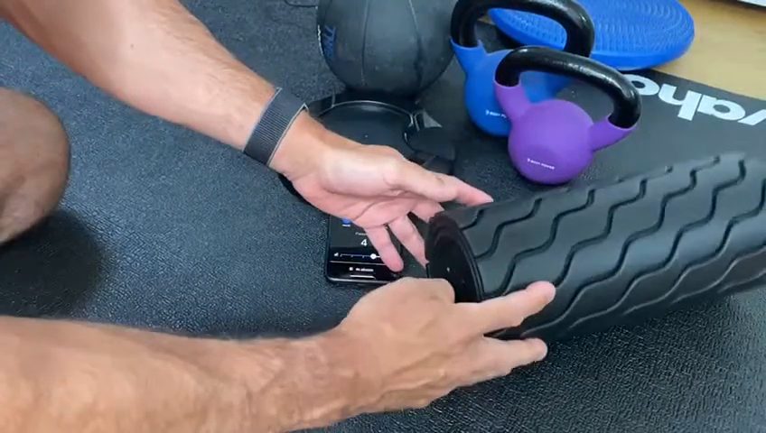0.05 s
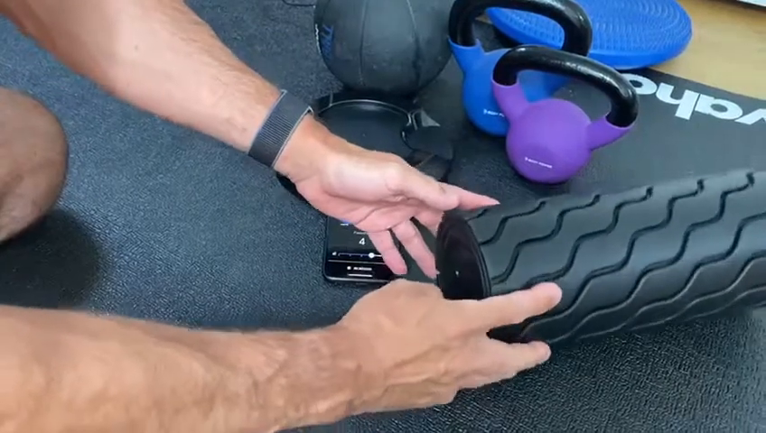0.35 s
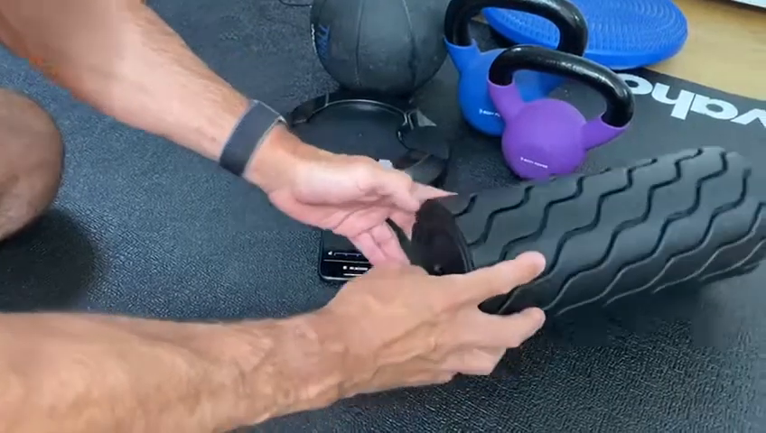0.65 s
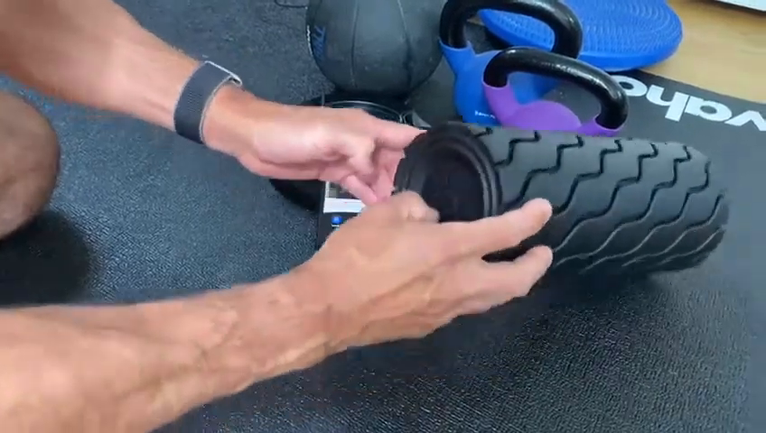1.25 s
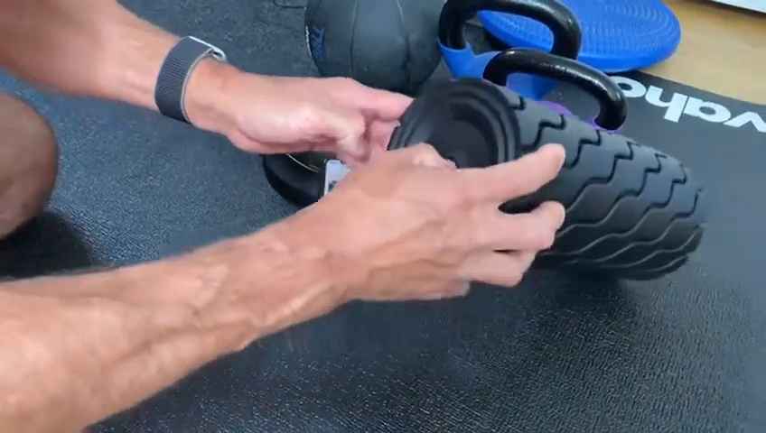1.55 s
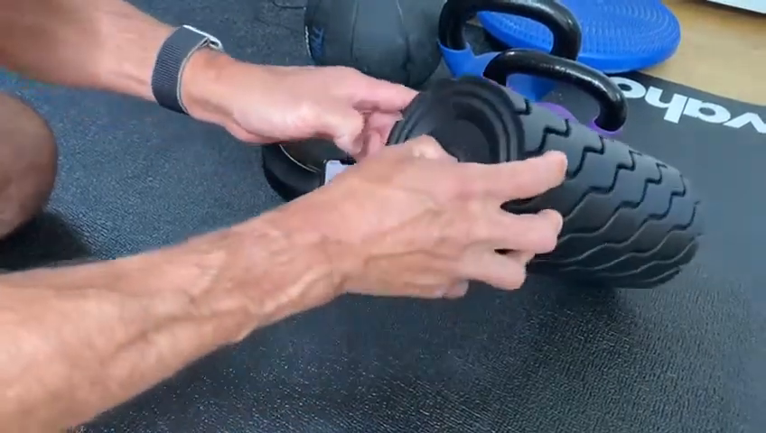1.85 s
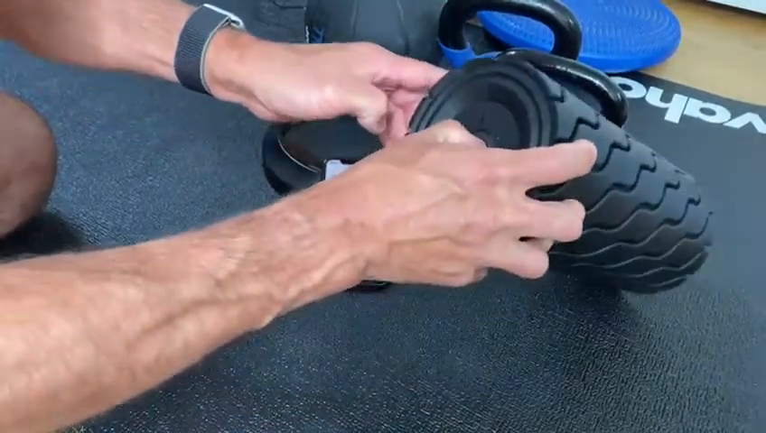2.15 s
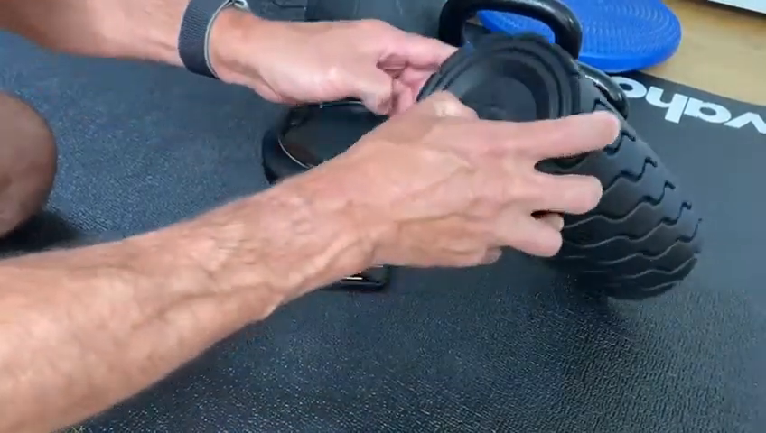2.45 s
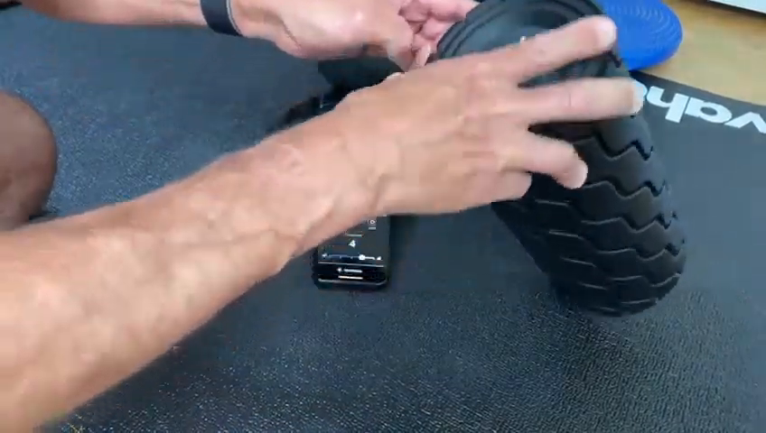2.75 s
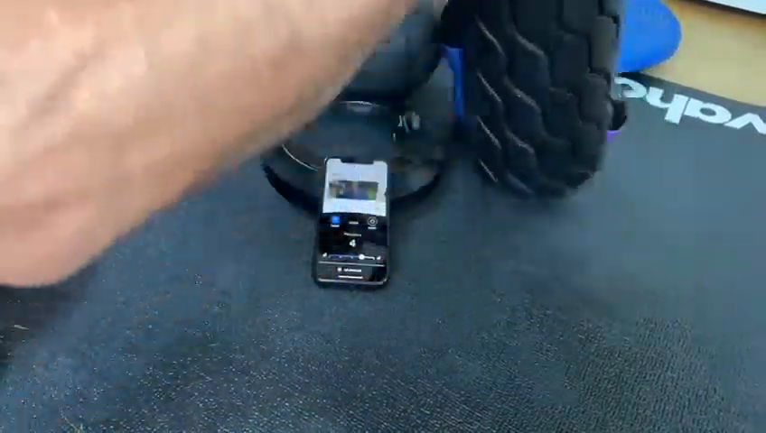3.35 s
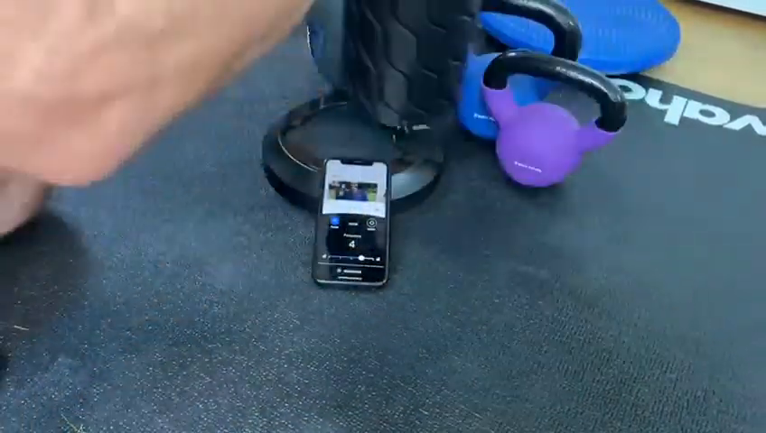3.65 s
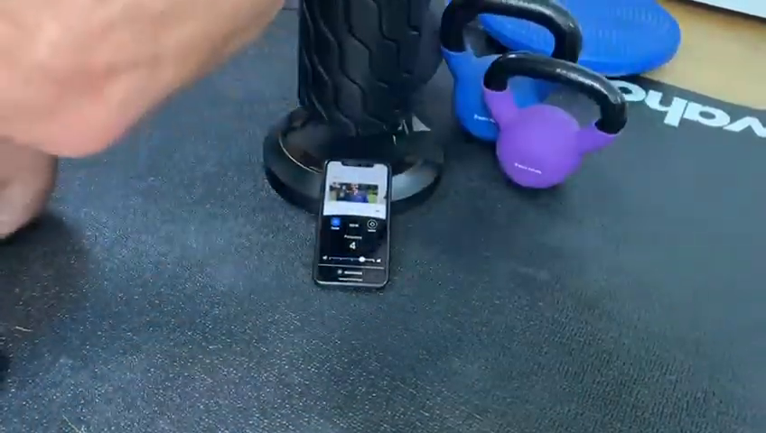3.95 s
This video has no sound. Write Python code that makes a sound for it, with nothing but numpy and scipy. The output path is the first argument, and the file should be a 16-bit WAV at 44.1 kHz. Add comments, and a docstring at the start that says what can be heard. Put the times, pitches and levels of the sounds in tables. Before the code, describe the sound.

A vibrating foam roller hums low from the start, bouncing on a mat with quick plastic clacks and hollow thuds that fade by 0.8 seconds. The hum continues with a buzzing rattle, which eases from about 1.7 to 2.3 seconds, with a couple of small clicks. At 2.4 seconds the motor switches off and whines down, stopping by 3. Faint handling bumps follow near 3 and 3.9 seconds.

```python
"""A low hum, and at once a run of plastic clacks and hollow thuds: a vibrating foam roller, shaken by
its off-centre weight at about sixty turns a second, bounces on a gym mat. Two hands steady it and tip
it on end; its loose housing chatters once a turn, except while it is pressed firm. It is switched off,
whines down to rest and is lifted away with a few light bumps in a quiet room."""
import sys
import numpy as np
from scipy import signal
from scipy.fft import rfft, irfft
from scipy.io import wavfile
from scipy.ndimage import uniform_filter1d, map_coordinates

SR = 44100
rng = np.random.default_rng(int(sys.argv[2]) if len(sys.argv) > 2 else 0)


def master_out(mix):
    """Clip the mix to full scale and print it as 16-bit PCM to the path in sys.argv[1]."""
    frames = np.transpose(np.atleast_2d(mix))
    ceiling = np.clip(frames, -1, 1)
    pcm = np.round(ceiling * 32767).astype(np.int16)
    wavfile.write(sys.argv[1], SR, pcm)


N = 176400
T = np.arange(N) / SR

# motor speed, in turns a second (time [s], speed [Hz])
MOTOR_SPEED = [(0, 63), (.65, 55.9), (.8, 59.9), (1.8, 60.9), (2.15, 59.9), (2.39, 60.0), (2.49, 48.5),
               (2.6, 39), (2.76, 24), (2.95, 4.43)]
# fader of the hum (time [s], level [dB])
HUM_FADER = [(0, -22.5), (.6, -24), (.75, -23), (1.2, -23), (2.38, -23.5), (2.44, -32.5), (2.5, -37),
             (2.55, -55), (2.61, -43), (2.68, -60), (2.95, -80)]
# overtones against the fundamental (multiple of the speed, level lying [dB], level on end [dB])
HUM_OVERTONES = [(2, -22, -23), (3, -24.5, -21.5), (4, -37, -23.5), (5, -33.5, -33), (6, -30.5, -27.5),
                 (7, -30.5, -24), (8, -30.5, -35.5), (9, -37.5, -31.5), (10, -43, -41), (11, -35, -36.5),
                 (20, -46, -44), (21, -45.5, -36.5), (29, -47, -50.5)]
# faders of bearing whirr, housing chatter, foam scuff and drive whine (time [s], level [dB])
WHIRR_FADER = [(0, -42.5), (.7, -47), (1.1, -48.5), (1.9, -50.5), (2.4, -53), (2.55, -56), (2.75, -54.5),
               (2.87, -66), (2.95, -86)]
CHATTER_FADER = [(0, -44), (.3, -47), (.6, -49), (.85, -47.5), (1.2, -48.5), (1.62, -46.5), (1.72, -61.5),
                 (2.25, -69.5), (2.37, -48.5), (2.48, -59.5), (2.75, -59), (2.95, -68), (3.15, -67.5),
                 (3.3, -79.5)]
SCUFF_FADER = [(0, -27), (.03, -36), (.55, -37), (.75, -40), (1.05, -49), (2.3, -49.5), (2.52, -50.5),
               (2.62, -51.5), (2.75, -48.5), (2.86, -57), (2.96, -66), (3.2, -74.5), (3.4, -97)]
WHINE_FADER = [(0, -80), (2.38, -76), (2.47, -54), (2.6, -51), (2.68, -58), (2.77, -54), (2.9, -72),
               (3, -95)]
# landings on the mat (time [s], clack trim [dB], thud level [dB], thud pitch [ratio], rebound [ratio])
LANDINGS = [(.031, -2, -1.5, 1.02, 1.23), (.115, 1, 1, 0.93, 0.83), (.200, 4, 2.5, 0.95, 0.71),
            (.254, -12, -8, 0.96, 1.9), (0.269, -12.5, -18, 0.8, 1.1), (.3315, 0.5, 0, 1.02, 1.3),
            (0.387, -9.5, -13.5, 0.41, 1.4), (0.404, -17.5, 1, .98, 0.091), (0.481, -2.5, -3, 1.026, 1.73),
            (.583, -3, -7, 0.96, 1.63), (.661, -9.5, -18.5, 0.81, 0.7), (.726, -13.5, -27, 1.2, 1.3),
            (0.769, -21.5, -24.5, 0.83, .9)]
# ring of the plastic core (frequency [Hz], width [Hz], relative level [dB])
CORE_MODES = [(666, 30, -2), (905, 80, 1), (1000, 35, -7), (1200, 37, 2.5), (1320, 14, -4.5),
              (1427, 59, -6.5), (1654, 35, -6.5), (2231, 45, -9.5), (2582, 47, -14.5), (3343, 92, -11.5)]
# ring of the hollow body (base frequency [Hz], relative level [dB], T60 [s], first swing [1 out, -1 in])
BODY_MODES = [(92.6, -15, .122, 1), (133.4, -14.5, 0.099, 1), (185.8, -8.5, 0.13, -1),
              (203.2, -14.5, 0.11, -1), (244, -17.5, 0.054, -1), (363.8, -26.5, 0.1, 1),
              (430, -30.5, .06, -1), (524.5, -34.5, 0.16, 1)]
# handling knocks (time [s], tick level [dB], centre [Hz], width [Hz], rise [s], decay [s], thud [dB])
HANDLING_KNOCKS = [(1.796, -31, 2500, 2490, 0.00021, 0.0016, -43),
                   (1.796, -34, 1330, 500, 0.00078, 0.0062, -53),
                   (1.893, -46.5, 7000, 7800, .0004, 0.0023, -48.5),
                   (2.268, -28.5, 940, 400, 0.00061, 0.0047, -48.5),
                   (2.336, -41.5, 8000, 5000, 0.00048, 0.0021, -53),
                   (2.509, -46.5, 2600, 3870, 0.0019, 0.0046, -43),
                   (2.842, -47.5, 3580, 7158, 0.0083, 0.018, -43),
                   (2.843, -47.5, 1100, 596, 0.0051, 0.015, -55),
                   (3.040, -55, 900, 3500, 0.0035, 0.026, -35),
                   (3.100, -55, 1117, 4055, 0.0021, 0.017, -49.5), (3.906, -55, 708, 650, .01, 0.03, -59),
                   (3.923, -60.5, 2200, 5050, 0.0021, .014, -59)]
# partials of the whine (multiple of the speed, relative level [dB], loss with slowing [dB/Hz])
WHINE_PARTIALS = [(17, 0, 0), (37.5, 3, .6)]
# EQ shapes of the noise layers (frequency [Hz], relative level [dB])
WHIRR_EQ = [(150, -33), (350, 1), (480, 0), (620, 1), (850, 1.5), (1020, -5.5), (1270, -2), (1500, -6),
            (1800, -9), (2200, -14), (4000, -21), (7000, -29), (12000, -35.5)]
CHATTER_EQ = [(300, -10.5), (900, -1.5), (1350, -5), (1750, -1.5), (2200, -7.5), (2550, -1.5), (2780, -0.5),
              (3020, -2.5), (3300, 1), (3600, -0.5), (3900, -4.5), (4700, -4.5), (6000, -7), (8000, -7.5),
              (12000, -17.5)]
SCUFF_EQ = [(25, -33.5), (60, -17), (120, -5), (195, 2.5), (270, -9.5), (450, -10), (700, -32.5),
            (2000, -50.5)]
AIR_EQ = [(20, -15.5), (45, -5), (85, 1.5), (150, -4), (280, -19), (420, -11.5), (700, -21), (1000, -22),
          (1600, -34.5), (4000, -37.5), (8000, -34.5), (12000, -44.5)]
CLACK_EQ = [(150, -20.5), (400, 4.5), (600, -0.5), (930, 3), (1350, -0.5), (1900, -8.5), (2800, -8.5),
            (4000, -10.5), (5500, -19), (8000, -22), (12000, -33.5)]
# overall tone colour (frequency [Hz], gain [dB])
TONE_EQ = [(15, -11.5), (40, 2.5), (7900, -6.5), (8700, -29.5), (9700, -19), (10600, -6), (12000, -16.5)]

FULL_SPEED_HZ = MOTOR_SPEED[0][1]
SPREAD, LEFT_DB = 0.46, 2  # the roller's stereo width and lean to the left


def amp(db):
    """Decibels to gain."""
    return 10 ** (np.asarray(db) / 20)


def curve(rows):
    """Straight lines through (time, value) rows."""
    return np.interp(T, *np.array(rows).T)


def unit(x):
    """Scale to rms 1."""
    return x / np.sqrt(np.mean(x ** 2))


def eq(x, points, keep_power=True):
    """Minimum-phase EQ through (Hz, dB) points; keep_power holds white noise at its level."""
    hz, db = np.array(points).T
    bins_hz = np.fft.rfftfreq(2 * N, 1 / SR)
    gain = amp(np.interp(np.log(bins_hz + 1), np.log(hz), db))
    cepstrum = irfft(np.log(unit(gain) if keep_power else gain))
    cepstrum[1:N] *= 2
    cepstrum[N + 1:] = 0
    return irfft(rfft(x, 2 * N) * np.exp(rfft(cepstrum)))[..., :N]


def wander(rate_hz):
    """Smooth random drift of rms 1."""
    hold = int(SR / rate_hz)
    steps = np.repeat(rng.standard_normal(N // hold + 1), hold)
    return unit(uniform_filter1d(uniform_filter1d(steps, hold), hold)[:N])


def stereo(pair, spread=SPREAD, left_db=LEFT_DB):
    """Mid and side to left and right."""
    sign = np.array([[1], [-1]])
    return (pair[0] + spread * sign * pair[1]) * amp(sign * left_db / 2)


def noise(spread=SPREAD, left_db=LEFT_DB):
    """Stereo white noise."""
    return stereo(rng.standard_normal((2, N)), spread, left_db)


def burst(start, rise, decay):
    """A straight attack and an exponential tail."""
    return np.clip((T - start) / rise, 0, 1) * np.exp(-np.maximum(T - start - rise, 0) / decay)


def resonate(x, hz, width):
    """One resonance, gain 1 at its centre."""
    return signal.lfilter(*signal.iirpeak(hz, hz / width, fs=SR), x)


def shaft_grit(turns, repeat, swell_db):
    """Contact noise that swells once a turn; at speed, a share recurs at the same shaft angle."""
    samples_per_turn = int(SR / FULL_SPEED_HZ)
    surface = rng.standard_normal((2, 4096))
    loop = np.array([map_coordinates(row, [turns % 1 * samples_per_turn], mode="wrap") for row in surface])
    share = repeat * (curve(MOTOR_SPEED) / FULL_SPEED_HZ) ** 5
    grit = np.sqrt(share) * stereo(loop) + np.sqrt(1 - share) * noise()
    return grit * unit(amp(swell_db * np.cos(2 * np.pi * turns)))


def hum(turns):
    """The off-centre weight shakes the roller; the overtones shift as it is tipped on end."""
    tipped = np.interp(T, (1.815, 1.92), (0, 1))
    tone = np.sin(2 * np.pi * turns + .03 * wander(40)) * amp(.3 * wander(30))
    for multiple, lying_db, on_end_db in HUM_OVERTONES:
        phase = 2 * np.pi * rng.random() + .2 * wander(17)
        level_db = lying_db + (on_end_db - lying_db) * tipped + 1.5 * wander(9)
        tone += amp(level_db) * np.sin(2 * np.pi * multiple * turns + phase)
    pan = amp([[-.25], [.25]])
    return np.sqrt(2) * tone * amp(curve(HUM_FADER)) * pan


def whirr(turns):
    """Motor and bearings roll with an even, midrange grain."""
    grit = shaft_grit(turns, repeat=.55, swell_db=.5)
    return eq(grit, WHIRR_EQ) * amp(curve(WHIRR_FADER) + 1.1 * wander(25))


def chatter(turns):
    """The loose housing buzzes brightly once a turn and ducks while pressed firm."""
    grit = shaft_grit(turns, repeat=.4, swell_db=3.5)
    return eq(grit, CHATTER_EQ) * amp(curve(CHATTER_FADER) + 1.3 * wander(50))


def scuff():
    """Foam rubs on mat and hands: a dark, uneven rustle."""
    return eq(noise(spread=.18, left_db=0), SCUFF_EQ) * amp(curve(SCUFF_FADER) + 4.2 * wander(25))


def air():
    """A faint, low bed of room tone."""
    return eq(noise(spread=.35, left_db=1), AIR_EQ) * amp(-67.5 + 1.3 * wander(6.5))


def clacks():
    """Each landing cracks the plastic core twice and leaves it rattling and ringing."""
    envelope = np.zeros(N)
    for start, clack_db, *_ in LANDINGS:
        first = burst(start, rise=.002, decay=.0021)
        second = amp(-8) * burst(start + .0084, rise=.0024, decay=.0021)
        rattle = amp(-11.5) * burst(start, rise=.004, decay=.025)
        envelope += amp(clack_db) * (first + second + rattle)
    crack = amp(-19) * envelope * noise(left_db=1.5)
    # the square root makes up for the power a narrow band loses
    ring = sum(amp(db) * np.sqrt(SR / np.pi / width) * resonate(crack, hz, width)
               for hz, width, db in CORE_MODES)
    return eq(crack, CLACK_EQ) + amp(-7) * ring / np.sqrt(len(CORE_MODES))


def body_ring(start, pitch, attack_s=.0049):
    """The hollow body rings after one push, its attack softened by the foam."""
    live = (T > start) & (T < start + .5)
    age = T[live] - start
    modes = sum(swing * amp(db - 60 * age / t60) * np.sin(2 * np.pi * hz * pitch * age)
                for hz, db, t60, swing in BODY_MODES)
    out = np.zeros(N)
    out[live] = modes * np.sin(np.pi / 2 * np.minimum(age / attack_s, 1)) ** 2
    return out


def thuds(lag_s=.0035, rebound_s=.0084):
    """Just behind each clack the body thumps, and again on the rebound."""
    out = np.zeros(N)
    for start, _, thud_db, pitch, rebound in LANDINGS:
        push = start + lag_s
        out += amp(thud_db) * (body_ring(push, pitch) + rebound * body_ring(push + rebound_s, pitch))
    return out


def knocks():
    """Fingers, the switch and light bumps tick on the shell and nudge the body into ringing."""
    out = np.zeros((2, N))
    for start, tick_db, hz, width, rise, decay, thud_db in HANDLING_KNOCKS:
        band = unit(resonate(resonate(noise(), hz, width), hz, width))
        out += amp(tick_db) * band * burst(start, rise, decay)
        out += amp(thud_db) * body_ring(start + rise, pitch=1)
    return out


def whine(turns):
    """The drive's whine comes forward at switch-off and dives with the speed."""
    slowing_hz = FULL_SPEED_HZ - curve(MOTOR_SPEED)
    tone = np.zeros(N)
    for multiple, db, loss in WHINE_PARTIALS:
        level_db = db - loss * slowing_hz + 2.5 * wander(60)
        tone += amp(level_db) * np.sin(2 * np.pi * multiple * turns + .9 * wander(90))
    return tone * amp(curve(WHINE_FADER))


def room(x, wet_db=-12, t60_s=.25, low_cut_hz=105):
    """Short, damped reflections, different on each side."""
    t = T[:SR // 2]
    tail = rng.standard_normal((2, len(t))) * 1000 ** (-t / t60_s) * (t > .004)  # 4 ms pre-delay
    tail = signal.sosfilt(signal.butter(4, low_cut_hz, "high", fs=SR, output="sos"), tail)
    tail /= np.sqrt(np.sum(tail ** 2) / 2)
    return amp(wet_db) * signal.fftconvolve(x, tail, axes=1)[:, :N]


def scene():
    """The roller on its mat, with a little room, over faint air."""
    turns = np.cumsum(curve(MOTOR_SPEED)) / SR
    motor = hum(turns) + whirr(turns) + chatter(turns) + whine(turns)
    roller = motor + clacks() + thuds() + scuff() + knocks()
    return roller + room(roller) + air()


def record(dry):
    """The sound tilts dark, with a dip near 9 kHz; a steep filter cuts the top."""
    high_cut = signal.ellip(8, .2, 70, 11900, fs=SR, output="sos")
    return signal.sosfilt(high_cut, eq(dry, TONE_EQ, keep_power=False))


dry = scene()
out = record(dry)
master_out(out)
```